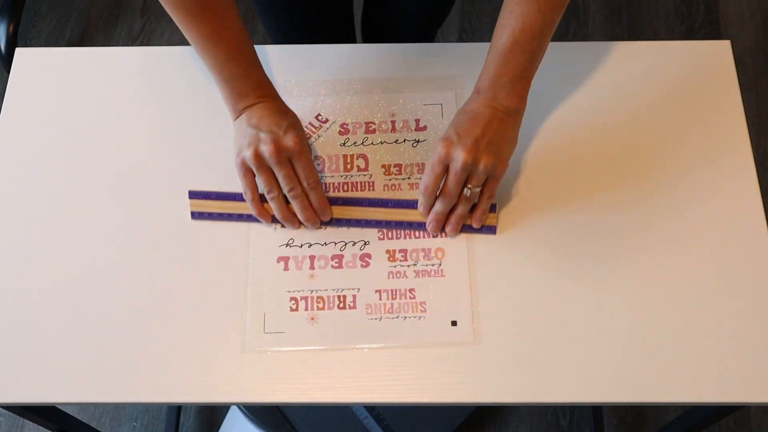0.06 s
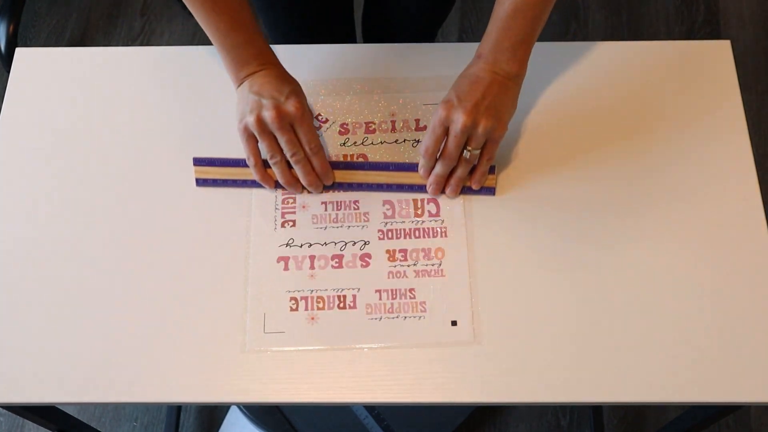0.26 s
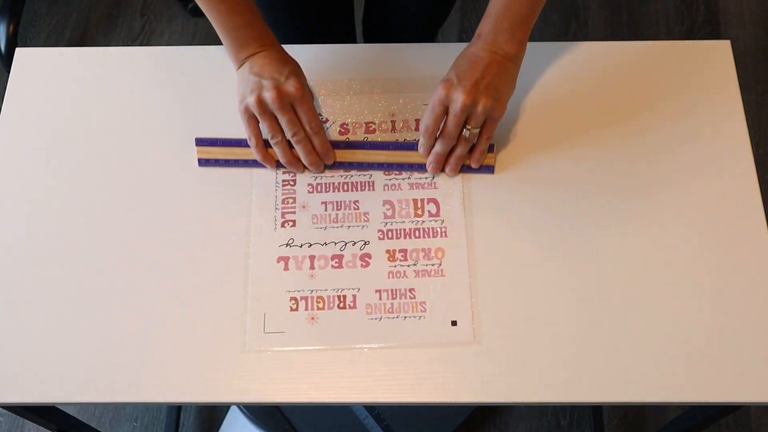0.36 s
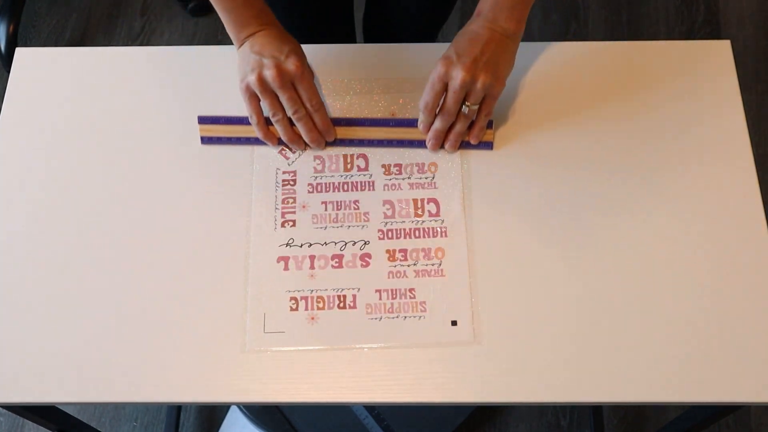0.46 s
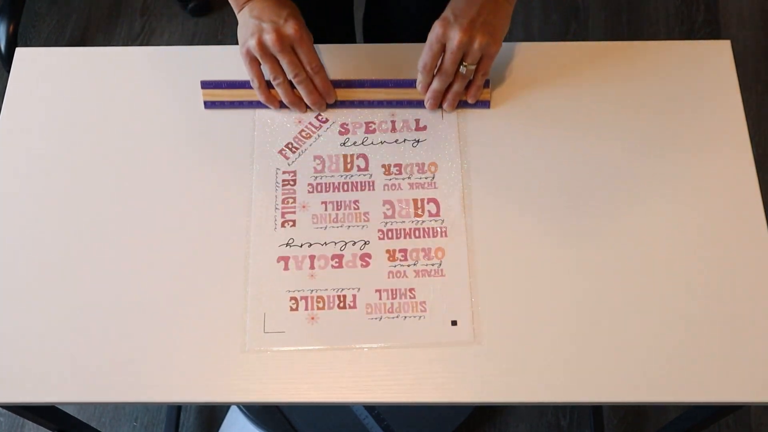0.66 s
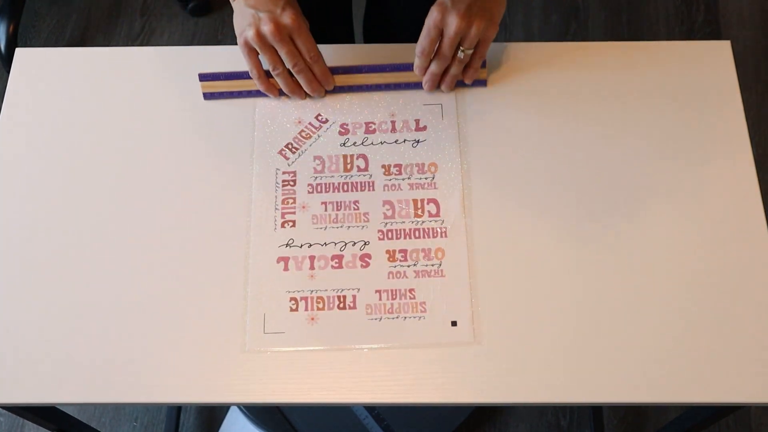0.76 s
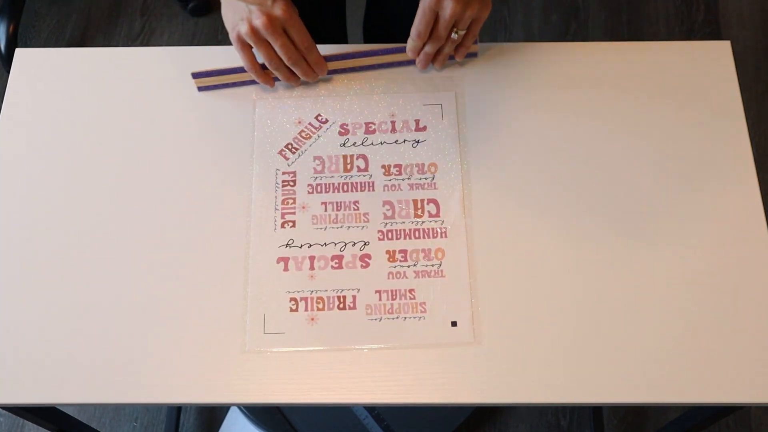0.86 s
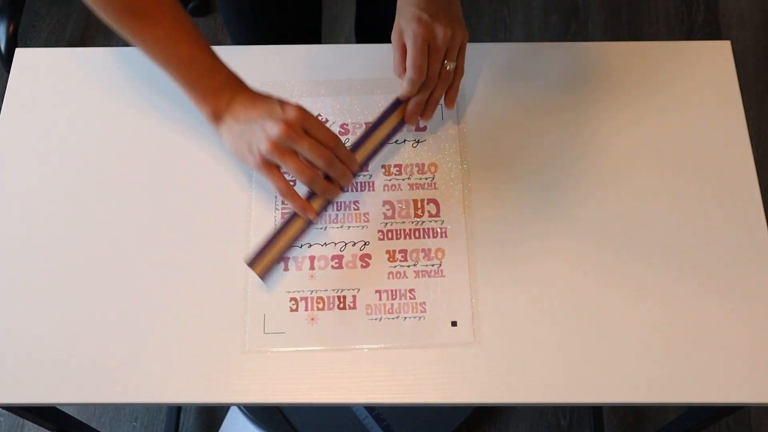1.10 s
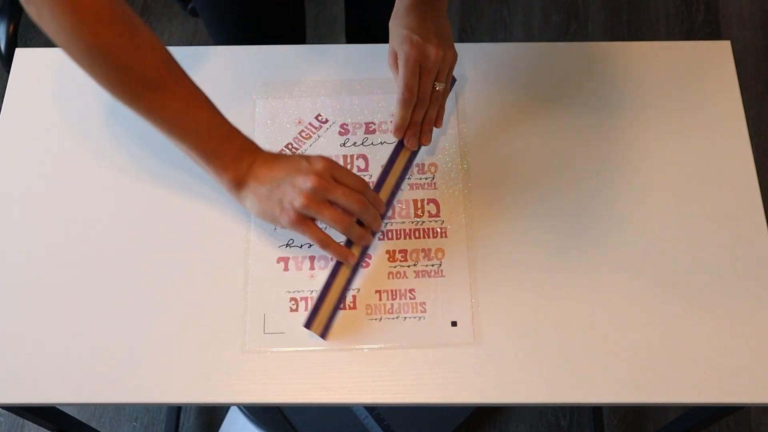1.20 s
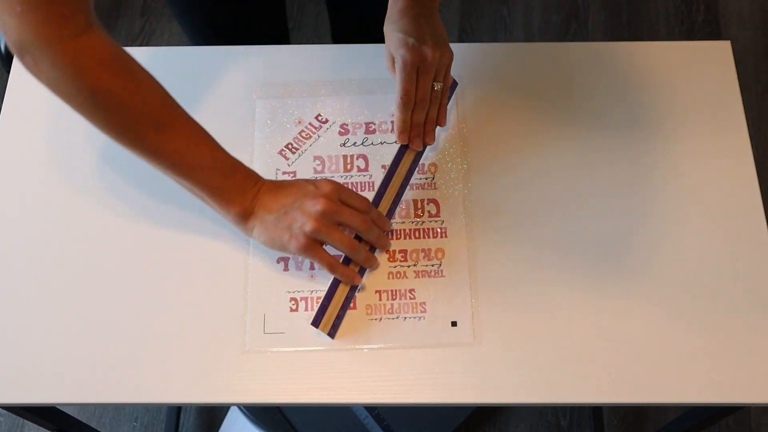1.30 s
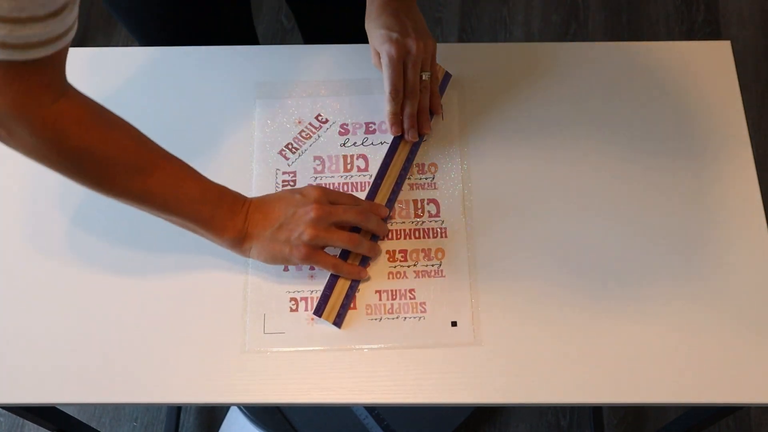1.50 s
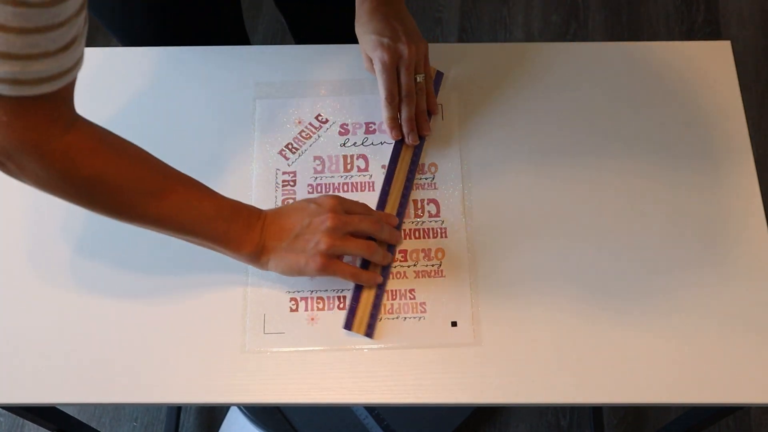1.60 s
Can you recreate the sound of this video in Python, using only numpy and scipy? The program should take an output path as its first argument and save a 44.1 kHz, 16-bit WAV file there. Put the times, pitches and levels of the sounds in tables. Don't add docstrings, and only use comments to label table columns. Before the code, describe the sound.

Close above a table, a ruler's edge rubs film with a dry hiss and low shudder, trapped air cracks early, bumps tick, then the ruler knocks hard and lands flat, echoing in a live room.

```python
import sys
import numpy as np
from scipy import signal
from scipy.fft import rfft, irfft, next_fast_len
from scipy.io import wavfile
from scipy.ndimage import map_coordinates

SR = 44100
rng = np.random.default_rng(int(sys.argv[2]) if len(sys.argv) > 2 else 0)


def materialize(psi):
    bounded = np.clip(np.atleast_2d(psi).T, -1, 1)
    quanta = np.round(bounded * 32767).astype(np.int16)
    wavfile.write(sys.argv[1], SR, quanta)


def magnitude_from_level(level_db):
    exponent = np.asarray(level_db, float) / 20
    return 10 ** exponent


N = 72765


def unit(x):
    return x / np.sqrt(np.mean(x ** 2) + 1e-20)


def along(points, hz):
    f, v = np.transpose(points)
    return np.interp(np.log(hz + 1), np.log(f + 1), v)


def filtered(x, response):
    m = next_fast_len(x.shape[-1] + 8192)
    spectrum = rfft(x, m) * response(np.fft.rfftfreq(m, 1 / SR))
    return irfft(spectrum, m)[..., :x.shape[-1]]


def coloured(x, curve_db):
    return filtered(x, lambda hz: magnitude_from_level(along(curve_db, hz)))


def body(peaks):
    def response(f):
        total = 0
        for k, (centre, width, db) in enumerate(peaks):
            damping = 1j * f * width
            total = total + (-1) ** k * magnitude_from_level(db) * damping / (centre ** 2 - f * f + damping + 1e-9)
        return total
    return response


def wobble(rate):
    knots = rng.standard_normal(int(N * rate / SR) + 4)
    return map_coordinates(knots, [np.arange(N) * rate / SR])


def tone(hz, wander):
    return np.sqrt(2) * np.sin(2 * np.pi * hz * np.arange(N) / SR + wander * wobble(22.06))


# frequency in Hz, correlation from -1 to 1.
ROOM_ALIKE = [(60, 1), (180, 0.78), (550, 0.7), (1650, -0.15), (4970, -0.72), (15000, -0.78)]


def spread(pair):
    def mid_and_side(hz):
        turn = np.arccos(np.clip(along(ROOM_ALIKE, hz), -1, 1)) / 2
        return np.array([np.cos(turn), np.sin(turn)])
    mid, side = filtered(pair, mid_and_side)
    return np.array([mid + side, mid - side])


# frequency in Hz, time to fall 60 dB in seconds.
ROOM_T60 = [(100, 0.2), (400, 0.61), (1500, 0.83), (3500, 0.77), (7000, 0.71), (12000, 0.44)]
# frequency in Hz, side over mid as a ratio.
DIRECT_SIDE = [(300, 0), (1500, -0.14), (4000, -0.12), (11000, -.1)]


def heard(x, room_db, to_walls=None):
    first_wall_s, build_s = 0.0021, 0.0055
    hz, t, z = signal.stft(rng.standard_normal((2, SR)), SR, nperseg=256)
    decay = magnitude_from_level(-60 * t / along(ROOM_T60, hz)[:, None])
    tail = signal.istft(z * decay, SR, nperseg=256)[1]
    age = np.clip(np.arange(tail.shape[1]) / SR - first_wall_s, 0, None)
    tail = spread(tail * (1 - np.exp(-age / build_s)))
    tail = tail / np.linalg.norm(tail[0])
    sent = x if to_walls is None else to_walls
    wet = signal.fftconvolve(sent[None], tail, axes=1)[:, :N]
    side = filtered(x, lambda hz: along(DIRECT_SIDE, hz))
    return np.array([x + side, x - side]) + magnitude_from_level(room_db) * wet


def struck(times_db, peaks, contact_s, rattle=0.42):
    out, t = np.zeros(N + SR), np.arange(2048) / SR
    for s, db in times_db:
        force = rattle * magnitude_from_level(-20 * t / contact_s) * rng.standard_normal(len(t))
        force[0] = 1
        hit = filtered(force, body(peaks))
        out[round(s * SR):][:len(t)] += magnitude_from_level(db) * hit / np.abs(hit).max()
    return out[:N]


def rub(curve_db, flutter_db):
    grains_per_s, grain_spread_db, grain_db = 1500, 3, -3.5
    happens = rng.random(N) < grains_per_s / SR
    size = magnitude_from_level(grain_spread_db * rng.exponential(size=N))
    grains = happens * size * rng.choice([-1, 1], N)
    force = rng.standard_normal(N) + magnitude_from_level(grain_db) * unit(grains)
    return unit(coloured(force, curve_db)) * magnitude_from_level(flutter_db * wobble(30))


# time in seconds, edge hiss in dB, table rumble in dB, ruler shudder in dB.
PUSH = [(0, -38.5, -35.5, -56.5), (.07, -43.5, -46, -38), (.16, -45, -42.5, -59),
        (0.211, -39.5, -47.5, -36), (0.299, -37.5, -45, -67), (0.348, -43, -41, -42),
        (.45, -45.5, -38, -46.5), (.54, -42.5, -44.5, -51), (.65, -42.5, -38.5, -47.5),
        (.74, -42, -39, -58), (.82, -39.5, -39, -75), (0.922, -35.5, -37, -39), (.97, -60, -39.5, -81),
        (1.2, -62.5, -72, -87), (1.28, -56, -62, -54), (1.379, -55, -48, -47.5), (1.499, -70.5, -56.5, -52),
        (1.65, -68, -56, -61.5)]
# frequency in Hz, density in dB per Hz.
HISS = [(1470, -42), (2500, -5), (3050, -9), (3800, -39), (4140, -2.5), (10400, -3), (13600, -1.5),
        (15500, -51)]
# frequency in Hz, density in dB per Hz.
RUMBLE_MIDDLE = [(29, -67.5), (50, -28), (108, -7.5), (221, -13.5), (330, -5), (542, -13), (628, -6.5),
                 (782, -9), (4000, -16), (5200, -54), (8800, -120)]
# frequency in Hz, density in dB per Hz.
RUMBLE_EDGE = [(29, -35), (50, -2), (102, -9), (479, -4), (557, -5.5), (612, -5.5), (1370, -4.5),
               (4500, -15), (5850, -46), (9900, -120)]


def push():
    t = np.arange(N) / SR
    s, *levels = np.transpose(PUSH)
    hiss_db, rumble_db, shudder_db = [np.interp(t, s, level) for level in levels]
    hiss = rub(HISS, flutter_db=3.0)
    near_edge = np.clip((t - 0.53) / 0.2, 0, 1)
    rumble = np.sqrt(1 - near_edge) * rub(RUMBLE_MIDDLE, flutter_db=-2.44)
    rumble = rumble + np.sqrt(near_edge) * rub(RUMBLE_EDGE, flutter_db=2.3)
    shudder = tone(342.4, wander=1) * magnitude_from_level(2.5 * wobble(18.34))
    friction = magnitude_from_level(hiss_db) * hiss + magnitude_from_level(rumble_db) * rumble
    return magnitude_from_level(-3.0) * heard(friction, room_db=5.5) + heard(magnitude_from_level(shudder_db) * shudder, room_db=-17)


# centre in seconds, length in seconds, pitch in Hz, level in dB.
SINGS = [(0.06, 0.088, 1086, -50), (0.009, 0.042, 579, -44), (0.456, 0.096, 628, -43.5),
         (0.613, 0.081, 624, -46), (0.696, 0.062, 470.4, -48), (0.714, 0.042, 610, -47)]


def sings():
    t = np.arange(N) / SR
    total = 0
    for s, length, hz, db in SINGS:
        total = total + magnitude_from_level(db) * np.exp(-((t - s) / length) ** 4) * tone(hz, wander=1.55)
    return heard(total, room_db=-10.5)


# start in seconds, peak in dB.
SNAPS = [(.0815, -21.5), (.2223, -22), (.2284, -16), (.2341, -9.5), (.2351, -6), (.2381, -32), (.2391, 8.5),
         (.2402, -9), (.2452, -11), (.328, -22), (.3295, -12.5)]
# centre in Hz, width in
# Hz, level in dB.
SNAP = [(10670, 1900, 1), (6700, 2640, -5), (4010, 2250, -8.5), (1600, 1400, -21.5)]
# start in seconds, peak in dB.
SNAP_THUMP = [(.2391, -23.5)]
# centre in Hz, width in Hz, level in dB.
THUMP = [(128.5, 240, -3), (800, 730, -11.5)]
# start in seconds, peak in dB.
CATCHES = [(.155, -38), (.4725, -28), (.476, -30.5), (.5, -29), (.601, -22.5), (.631, -32.5),
           (.6515, -22.5), (.663, -26.5), (.69, -25.5), (.698, -36.5), (.741, -27)]
# centre in Hz, width in Hz, level in dB.
CATCH = [(1190, 460, -0.5), (3100, 1100, -12)]


def film():
    snaps = struck(SNAPS, SNAP, contact_s=0.00027) + struck(SNAP_THUMP, THUMP, contact_s=0.0005)
    catches = struck(CATCHES, CATCH, contact_s=0.00134, rattle=0.061)
    return heard(snaps, room_db=0) + heard(catches, room_db=7)


# start in seconds, peak in dB, contact in seconds, room level in dB.
KNOCKS = [
    (0.8624, -2.5, 0.0016, 1.5),
    (1.3072, -9, 0.0082, -9.5),
]
# centre in Hz, width in Hz, level in dB.
EDGE_ON = [(760, 175, 2.5), (1250, 510, -0.5), (1600, 230, 3.5), (2530, 630, 0), (3160, 310, -8.5),
           (410, 160, -8), (5900, 2500, -13.5)]
# centre in Hz, width in Hz, level in dB.
FLAT_ON = [(774, 410, 3), (1650, 300, -7.5), (2230, 690, 2), (4350, 760, -23), (5860, 370, -36)]
# centre in Hz, width in Hz, level in dB.
THUD = (120, 50, -15)
# frequency in Hz, density in dB per Hz.
EDGE_SPREADS = [(59, -35), (100, -7.5), (403, -13), (645, -4), (855, -11), (1270, -2.5), (2110, 0),
                (4400, -12.5), (9000, -29.5), (11700, -65), (19800, -120)]
# frequency in Hz, density in dB per Hz.
FLAT_SPREADS = [(100, -12), (255, -6.5), (330, -10.5), (950, 0), (1400, -10), (1700, -1.5), (2600, -7.5),
                (9000, -32)]
# pitch in Hz, level in dB, time to fall 60 dB in seconds.
RINGS = [
    [(1730, -32, 0.29), (480, -39, 1)],
    [(1670, -41.5, 0.76), (255.7, -42.5, 0.96)],
]


def knocks():
    t = np.arange(N) / SR
    out = 0
    landings = zip(KNOCKS, (EDGE_ON, FLAT_ON), (EDGE_SPREADS, FLAT_SPREADS), RINGS)
    for (s, db, contact_s, room_db), peaks, colour, modes in landings:
        click = 1. * (np.arange(N) == round(s * SR))
        to_walls = coloured(click, colour)
        touches = [(s - 0.0006, db - 11.5), (s, db), (s + 0.002124, db - 8)]
        near = struck(touches, peaks + [THUD], contact_s, rattle=0.11)
        near = filtered(near, lambda hz: 1 / (1 + 1j * hz / 5000) ** 2)
        age = np.clip(t - s, 0, None)
        for hz, level, t60 in modes:
            envelope = magnitude_from_level(level - 60 * age / t60) * (1 - np.exp(-age / 0.02))
            out = out + envelope * tone(hz, wander=1.4)
        out = out + heard(near, room_db + 15.5, to_walls / np.linalg.norm(to_walls))
    return out


# centre in seconds, length in seconds, pitch in Hz, level in dB.
SWAYS = [(0.108, 0.055, 60, -54), (.22, 0.018, 115, -49), (0.356, 0.056, 110, -54), (.77, 0.097, 68, -48.5),
         (1.26, 0.035, 38, -53), (1.346, .04, 40, -59)]


def sway():
    t = np.arange(N) / SR
    total = 0
    for s, length, hz, db in SWAYS:
        total = total + magnitude_from_level(db + 3.5) * np.exp(-((t - s) / length) ** 2) * np.sin(2 * np.pi * hz * t)
    return total


# frequency in Hz, density in dB per Hz.
AIR = [(15, -32), (25, -5.5), (389, -4.5), (895, -10), (1080, -5), (1200, -9), (1660, -14.5),
       (10100, -24.5), (15500, -41)]


def air():
    pair = coloured(rng.standard_normal((2, N)), AIR)
    return magnitude_from_level(-48.5 + 1.1 * wobble(3.7)) * unit(spread(pair))


def scene():
    return push() + sings() + film() + knocks() + sway() + air()


def band_limit(x):
    return signal.sosfilt(signal.butter(12, 15660, fs=SR, output="sos"), x)


# frequency in Hz, gain in dB.
MIC_TOP = [(12000, 1), (13500, -8.5), (15000, -5), (16000, -34)]


def record(dry):
    mix = np.clip(coloured(dry, MIC_TOP), -1, 1)
    return band_limit(mix)


dry = scene()
out = record(dry)
materialize(out)
```